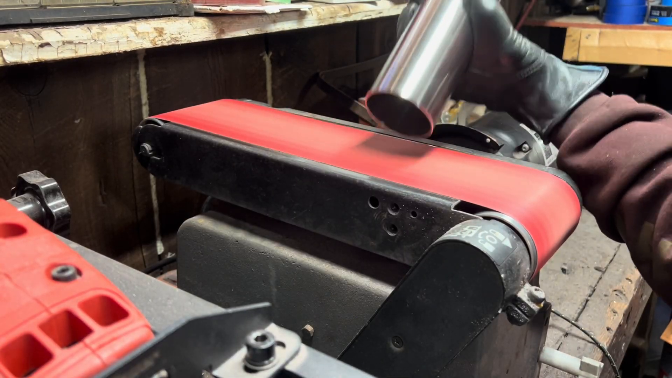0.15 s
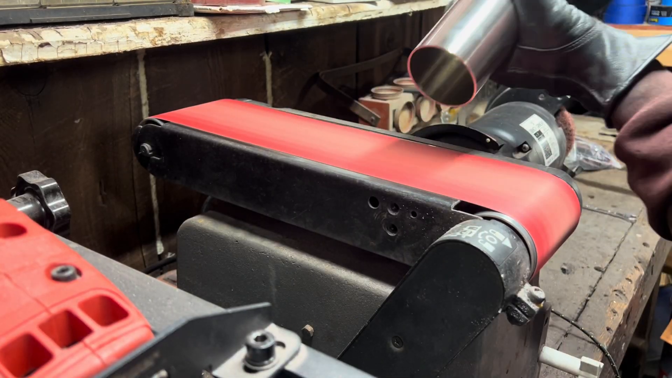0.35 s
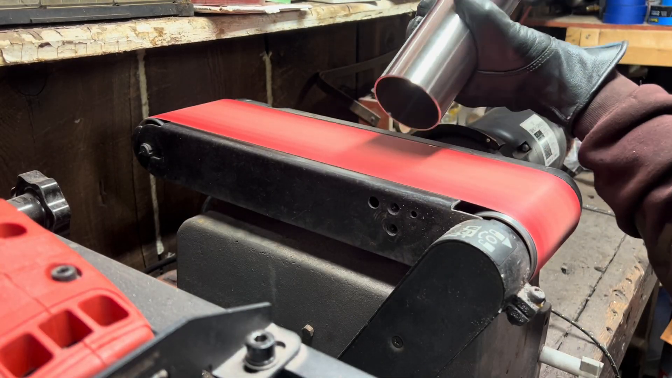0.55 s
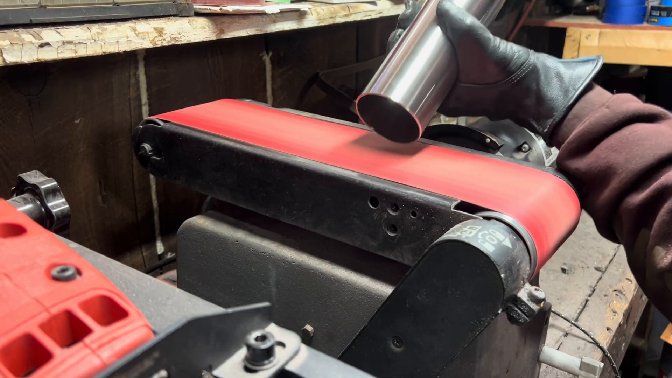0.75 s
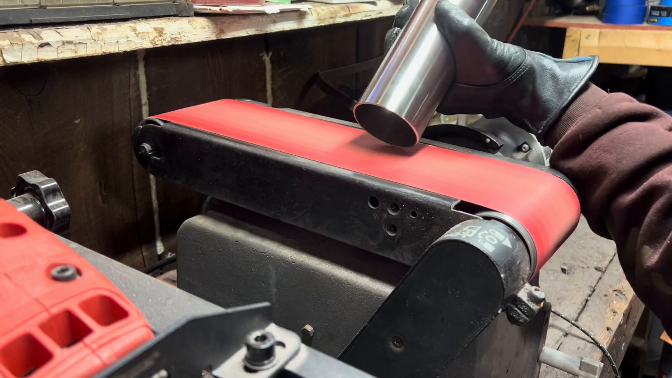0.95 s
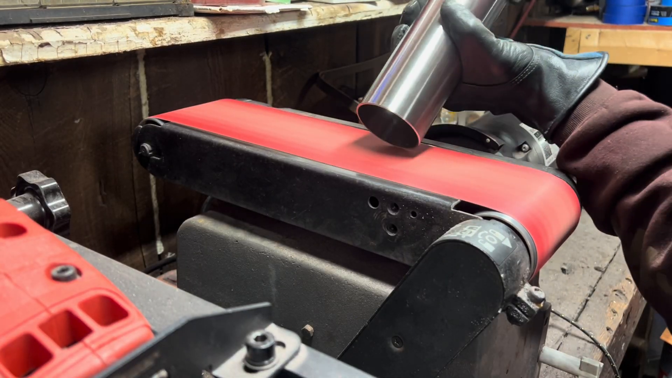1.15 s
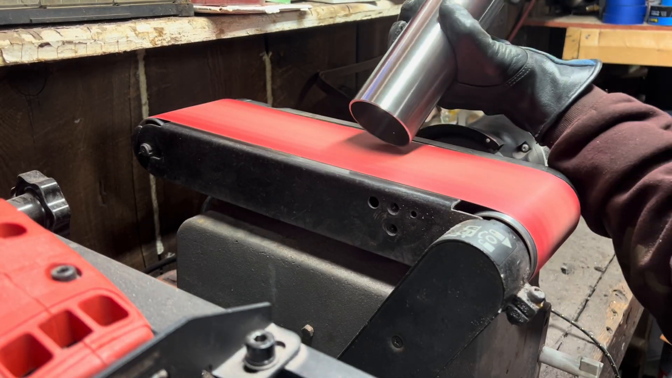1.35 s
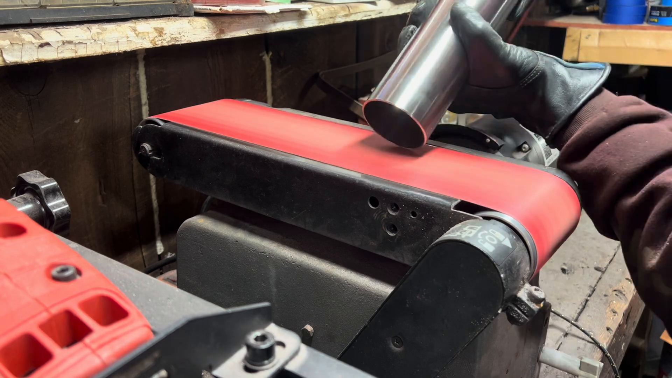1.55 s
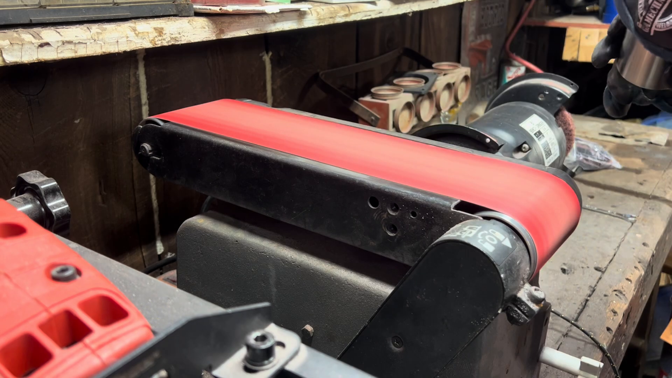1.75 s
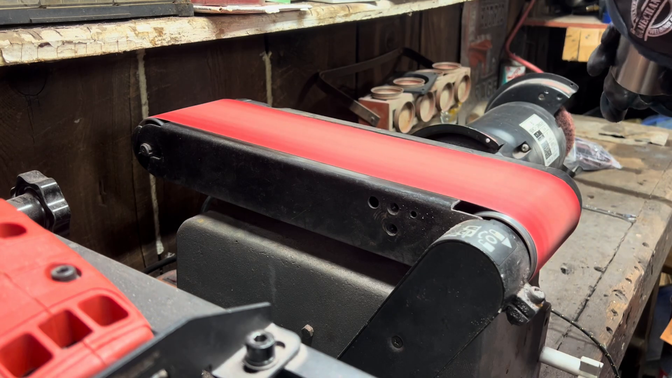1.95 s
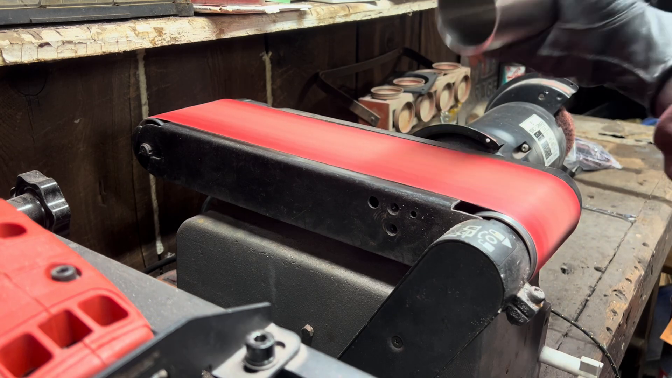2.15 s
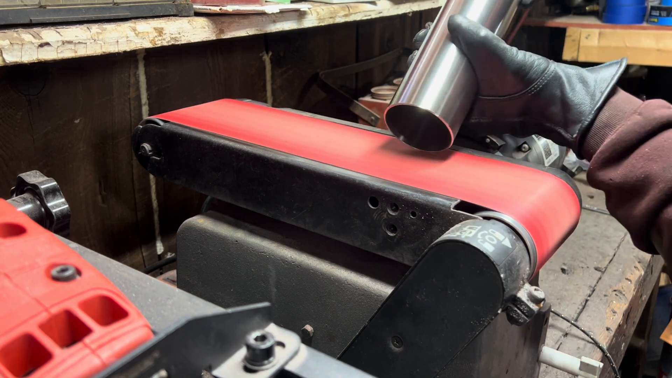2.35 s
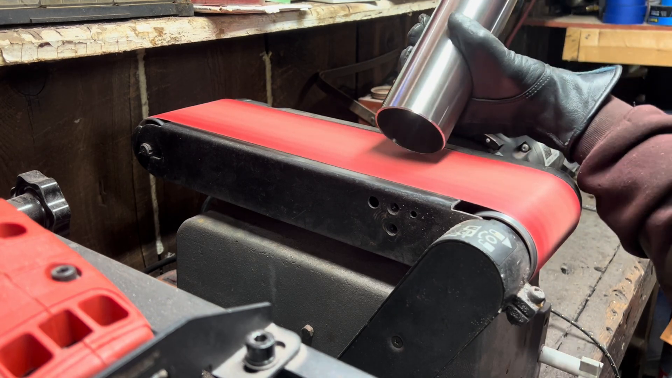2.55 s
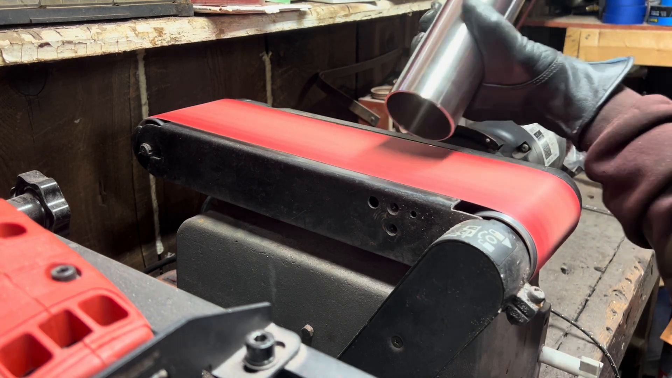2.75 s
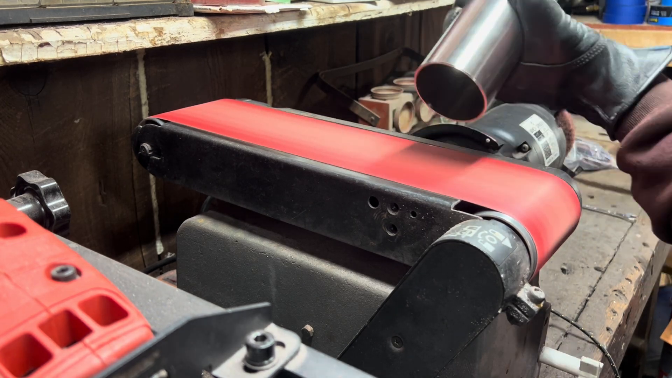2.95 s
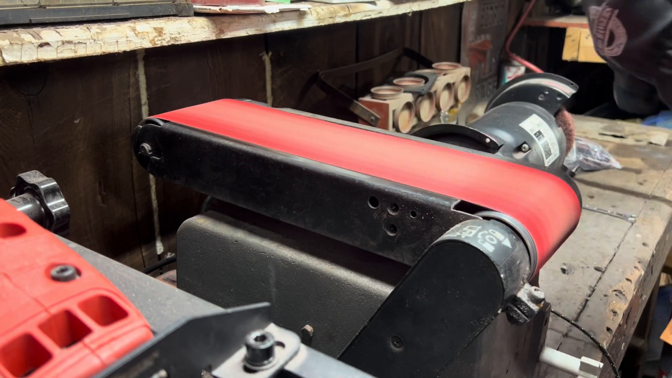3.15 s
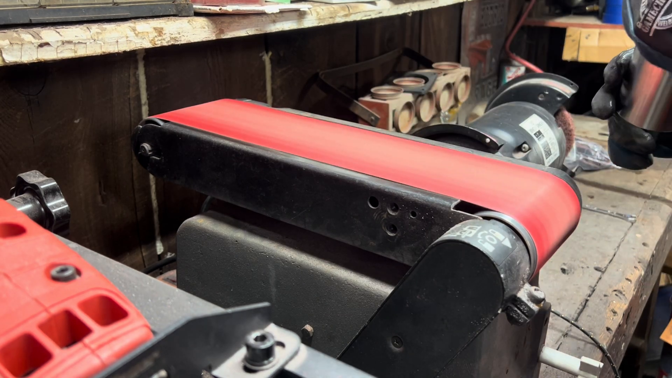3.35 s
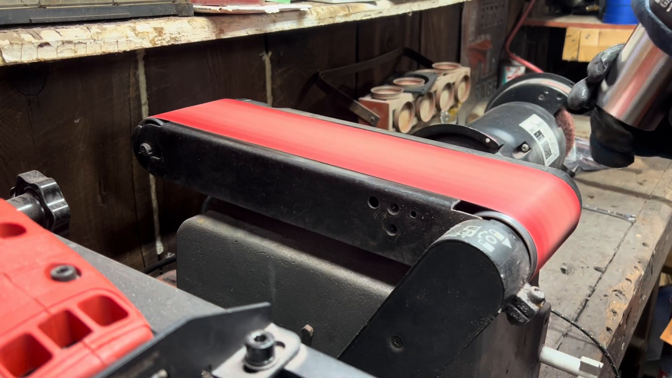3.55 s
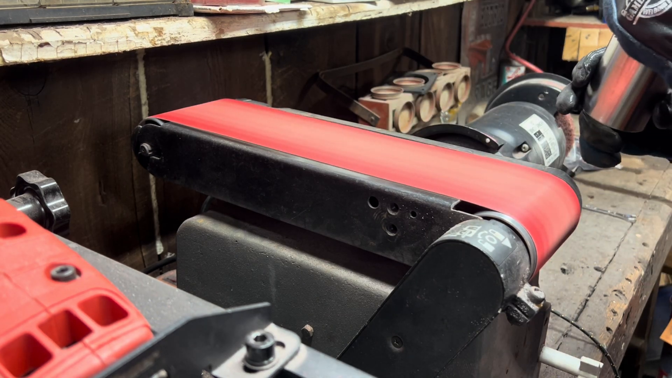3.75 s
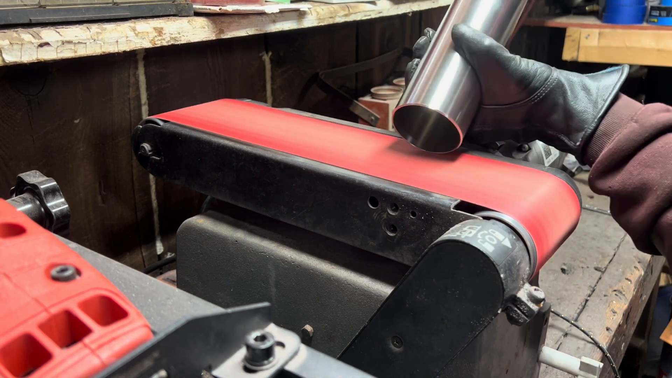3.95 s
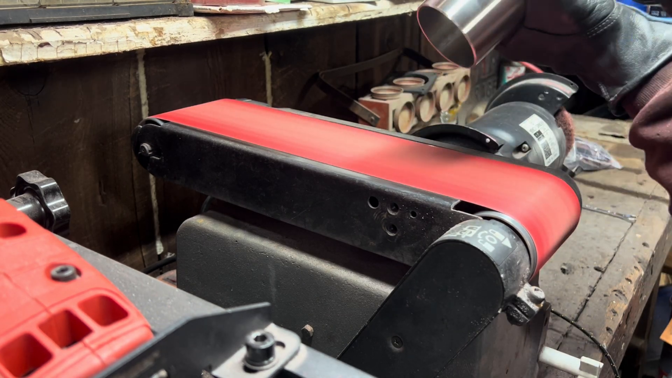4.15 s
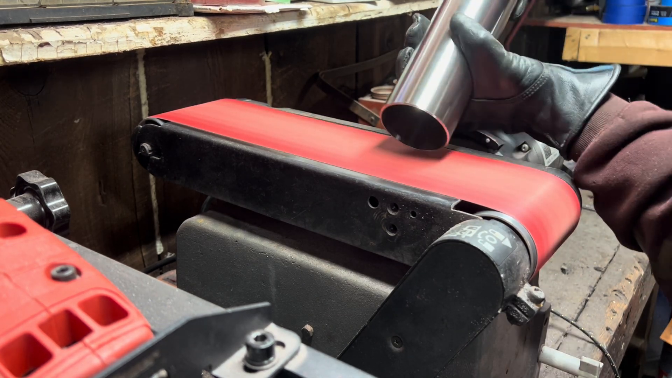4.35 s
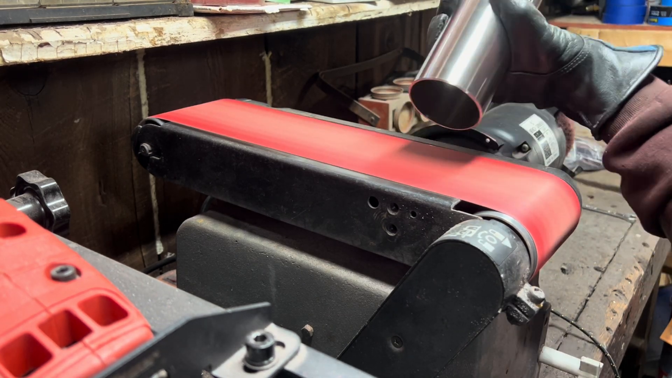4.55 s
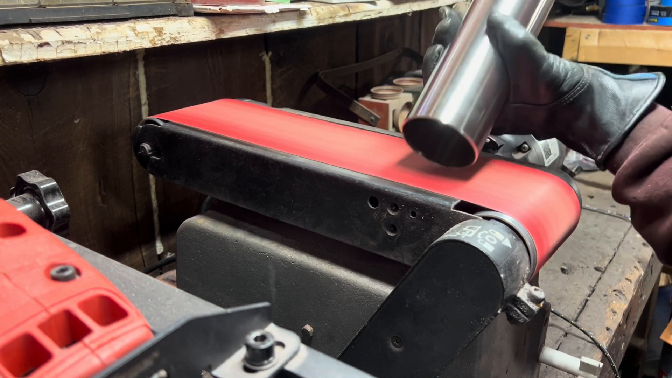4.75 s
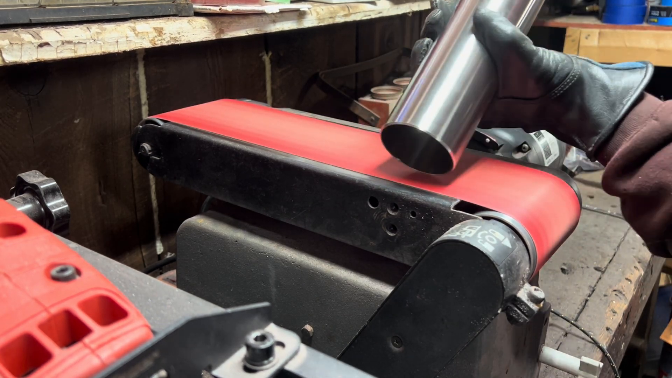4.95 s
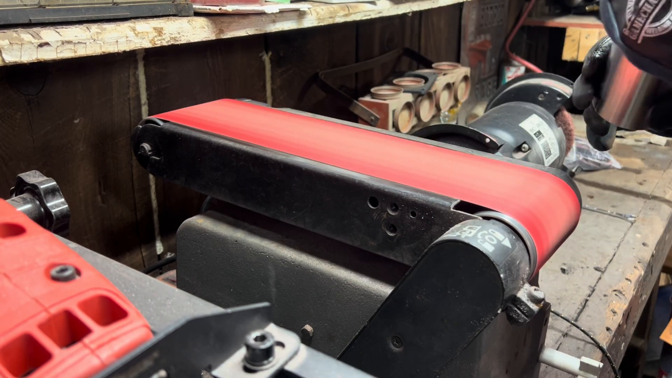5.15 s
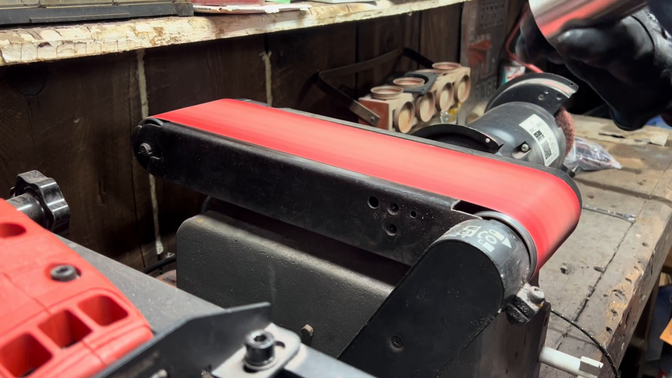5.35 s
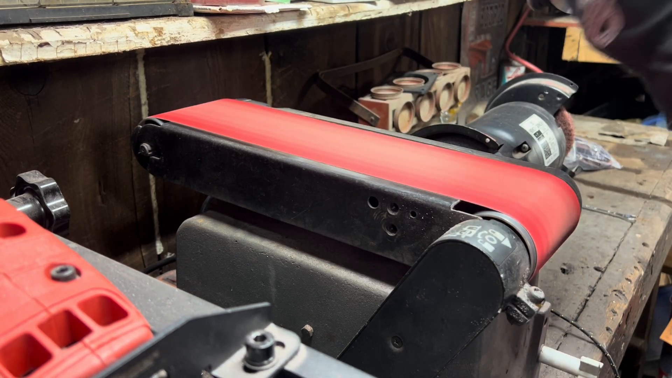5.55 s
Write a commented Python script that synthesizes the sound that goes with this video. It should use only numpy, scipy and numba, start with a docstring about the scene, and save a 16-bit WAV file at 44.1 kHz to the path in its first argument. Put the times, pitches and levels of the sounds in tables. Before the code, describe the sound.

Short, hissing metallic scrapes repeat about five times a second as a steel tube is ground on a running belt sander. They come in three groups separated by brief pauses, the last group the sharpest. Underneath, the motor hums, the bearings whistle and the belt hisses throughout, while the whine dips slightly with each touch. The sound is close and in stereo, with a little workshop reflection.

```python
"""Steel tube on a belt sander

A bench belt sander runs in a workshop, close to a pair of microphones. The housing rumbles, another machine
nearby hums, the bearings whistle and the belt hisses over its platen. The end of a steel tube is touched to the
belt in short strokes: grit scratches ring the tube wall, the rim shrieks where it bites, and the whine of the
drive sags under each stroke."""
import sys
import numpy as np
from scipy import signal
from scipy.fft import rfft, irfft, next_fast_len
from scipy.io import wavfile
from scipy.ndimage import uniform_filter1d
from numba import njit

SR = 44100
rng = np.random.default_rng(int(sys.argv[2]) if len(sys.argv) > 2 else 0)


def output_pcm(signal):
    """Save a mono or channel-first signal as 16-bit PCM at the path in sys.argv[1].

    Samples are clipped to [-1, 1] before scaling.
    """
    pcm = np.clip(np.atleast_2d(signal).T, -1, 1) * 32767
    wavfile.write(sys.argv[1], SR, np.round(pcm).astype(np.int16))


N = 246959
T = np.arange(N) / SR
FFT_SIZE = next_fast_len(N + 4096, True)
FREQS = np.arange(FFT_SIZE // 2 + 1) * SR / FFT_SIZE


def undb(db):
    """Decibels to gain."""
    return 10 ** (np.asarray(db) / 20)


def unit(x):
    """Scale to rms 1."""
    return x / np.sqrt(np.mean(x ** 2))


def shape(points):
    """Gain at every frequency from (freq_hz, level_db) points."""
    hz, db = np.transpose(points)
    return undb(np.interp(np.log(FREQS + 1), np.log(hz), db))


def colour(x, gain):
    """Filter by a gain at every frequency."""
    return irfft(rfft(x, FFT_SIZE) * gain, FFT_SIZE)[:N]


def resonances(modes):
    """Gain of a set of steep-sided resonances; each level sets the power of the whole peak."""
    return np.sqrt(sum(undb(db) ** 2 / width / (1 + ((FREQS - hz) / (0.44 * width)) ** 2) ** 2
                       for hz, width, db in modes))


@njit
def bandpass(x, centre_hz, width_hz):
    """State-variable band-pass whose centre moves."""
    y, band_state, low_state = np.empty(len(x)), 0., 0.
    for i in range(len(x)):
        g, damping = np.tan(np.pi * centre_hz[i] / SR), width_hz / centre_hz[i]
        band = (band_state + g * (x[i] - low_state)) / (1 + g * (g + damping))
        band_state = 2 * band - band_state
        low_state += 2 * g * band
        y[i] = damping * band
    return y


def walk(rate_hz):
    """Smooth random drift of rms 1, with rate_hz new values a second."""
    hold = max(int(SR / rate_hz), 2)
    steps = np.repeat(rng.standard_normal(N // hold + 2), hold)[rng.integers(hold):][:N]
    return unit(uniform_filter1d(uniform_filter1d(steps, hold), hold))


def phase_of(hz):
    """Phase in radians of a moving frequency."""
    return 2 * np.pi * np.cumsum(hz) / SR


def swell(points):
    """Level curve through (time_s, level_db) points, in dB above its own mean."""
    db = np.interp(T, *np.transpose(points))
    return db - db.mean()


def tones(table, flicker_db):
    """Steady tones that waver a little in level and pitch; close pairs beat."""
    total = 0
    for hz, db, wander_hz in table:
        amplitude = np.sqrt(2) * undb(db + flicker_db * walk(14))
        phase = phase_of(hz + wander_hz * walk(12)) + 2 * np.pi * rng.random()
        total += amplitude * np.sin(phase)
    return total


def grit(grains_per_s, spread_db):
    """Clicks of single abrasive grains, a few of them larger than the rest."""
    size = undb(spread_db * np.minimum(rng.exponential(size=N), 4))
    strikes = rng.random(N) < grains_per_s / SR
    return unit(strikes * size * rng.choice([-1, 1], N))


def reflections(x, t60_s):
    """Dense echoes from the bench and workshop walls, as strong as the sound itself."""
    t = T[:SR // 2]
    tail = rng.standard_normal(len(t)) * undb(-60 * t / t60_s) * (t > .002)
    return signal.fftconvolve(x, tail / np.linalg.norm(tail))[:N]


# stereo width of the sound at each frequency: freq_hz, side_minus_mid_db
STEREO_WIDTH = [(50, -5), (120, -6), (250, -20), (400, -27), (720, -25), (1150, -9), (1700, -8),
                (2200, -21), (3000, -23), (3800, -9), (6500, -9), (8200, -12), (10500, -5.5), (15000, -4)]
# tilt between the two microphones: freq_hz, left_minus_right_db
MIC_TILT = [(700, 0), (1300, -.5), (2400, 0), (4400, 1.5), (8100, -1), (12000, 2.2), (15000, 2.5)]


def microphone_pair(direct, diffuse):
    """Left and right at the bench: direct sound in the centre, diffuse sound from the sides."""
    side = colour(diffuse, shape(STEREO_WIDTH))
    lean = np.sqrt(shape(MIC_TILT))
    return np.array([colour(direct + side, lean), colour(direct - side, 1 / lean)])


# rise and fall of the running machine, heard at the bench: time_s, relative_db
MACHINE_LEVEL = [(0.0, -39), (0.2, -35.5), (1.55, -36.5), (2.45, -33.3), (2.85, -37), (3.0, -36.5),
                 (3.25, -36), (3.95, -32.5), (5.15, -37.5), (5.6, -35)]
# spectrum of the housing's rumble: freq_hz, relative_db
HOUSING_SPECTRUM = [(20, -31), (150, -32), (225, -29.5), (280, -16), (335, -2), (400, -4), (485, 6),
                    (550, -0.5), (690, 6), (770, -1), (1100, -3.5), (1300, -6.5), (2000, -8.5), (4000, -31)]


def housing_rumble(level_db=-42.5, follow=0.88):
    """The housing gives a low noise that swells with the machine."""
    rumble = unit(colour(rng.standard_normal(N), shape(HOUSING_SPECTRUM)))
    return rumble * undb(level_db + follow * swell(MACHINE_LEVEL))


# steady tones of another machine nearby: pitch_hz, relative_db, wander_hz
NEARBY_HUM_TONES = [(177.6, -77, .1), (349.7, -46.5, 1.8), (588.9, -40.8, .8), (598, -54, 1), (698.5, -46, 2.5),
                    (710.3, -45.8, 1), (818.3, -58, 1), (888.5, -52.5, .7), (957, -54, 1.5), (988, -57, 3),
                    (1076, -53, 7), (1200, -50.7, .3), (1378, -54.7, .4), (1595, -58, 6), (1674, -60, 3)]


def nearby_hum(gain_db=-1, follow=0.87):
    """Another machine in the workshop hums in wavering tones that swell with the sander's level."""
    return tones(NEARBY_HUM_TONES, flicker_db=1.5) * undb(gain_db + follow * swell(MACHINE_LEVEL))


# tones of the bearings: pitch_hz, relative_db, wander_hz
BEARING_TONES = [(4290, -58, 1), (4769, -51, 2), (5580, -49, 2), (5979, -53, 2), (6977, -50, 2),
                 (9060, -50, 5), (14304, -57, 4)]


def bearing_whistle(gain_db=-1):
    """The bearings give thin, high whistles that flicker."""
    return tones(BEARING_TONES, flicker_db=4.5) * undb(gain_db)


# rise and fall of the drive's whine: time_s, relative_db
WHINE_LEVEL = [(0.0, -42), (0.45, -39.5), (0.9, -45.5), (1.15, -41), (1.75, -44.5), (1.85, -36),
               (2.05, -45.5), (2.15, -37.5), (2.95, -46.5), (3.05, -43), (3.5, -45.5), (3.65, -39.5),
               (3.75, -42.5), (3.85, -36), (4.2, -42.5), (5.05, -44.5), (5.15, -47), (5.6, -41.5)]
# partials of the drive: tooth_rate_multiple, relative_db
DRIVE_PARTIALS = [(1, -15.5), (2, -4), (4, -10.5), (5, 2), (6, -3), (7, -4), (8, -5), (9, -8), (10, -11),
                  (12, 6), (13, 1), (14, -28), (17, 0)]


def drive_whine(contact, tooth_hz=475.4, sag=.016, inertia_s=.02, waver=.002, gain_db=-44, flutter_db=3):
    """Tooth phase and whine of the drive, which slows while the tube drags on the belt."""
    lag = np.exp(-1 / (inertia_s * SR))
    load = signal.lfilter([1 - lag], [1, -lag], contact)
    tooth_phase = phase_of(tooth_hz * (1 - sag * load + waver * walk(25)))
    swell_db = swell(WHINE_LEVEL) + flutter_db * np.tanh(walk(24.91))
    whine = 0
    for multiple, db in DRIVE_PARTIALS:
        stutter = 1 + .36 * (walk(55) + 1j * walk(55))  # in both strength and phase
        partial = (stutter * np.exp(1j * multiple * tooth_phase)).imag
        follow = np.clip(undb(db), 0.3, 1)  # strong partials follow the swell most
        whine += undb(db + follow * swell_db) * partial
    return tooth_phase, whine * undb(gain_db)


# brief scuffs of the belt on its platen: time_s, rise_db
BELT_SCUFFS = [(0.015, 5.5), (1.848, 3.5), (1.923, 3.5), (4.2, 4), (5.38, 1), (5.495, 3)]


def rubbing_swell(lap_hz=7.69, lap_peak_s=.046, lap_db=1.2, flutter_db=.9, scuff_s=.02):
    """Swell of the belt's rubbing in dB: it follows machine and whine, peaks once a lap and scuffs."""
    following = 0.58 * swell(MACHINE_LEVEL) + 0.15 * swell(WHINE_LEVEL)
    lap = lap_db * np.cos(2 * np.pi * lap_hz * (T - lap_peak_s))
    scuffs = sum(db * np.exp(-((T - time_s) / scuff_s) ** 2) for time_s, db in BELT_SCUFFS)
    return following + lap + flutter_db * walk(45) + scuffs


# hiss of the belt over the platen, from close by: freq_hz, relative_db
BELT_SPECTRUM = [(200, -54), (1200, -16.5), (2400, -10), (4300, -10), (5200, -5.5), (6400, -12), (7400, -2),
                 (8400, -1.5), (9400, -6.5), (11700, -10.5), (12650, -17), (13800, -13), (15800, -19)]
# rings of the platen: pitch_hz, width_hz, relative_db
PLATEN_MODES = [(5460, 210, -10.5), (5630, 290, 0), (5990, 110, -14.5), (6120, 50, -4), (6695, 170, -1),
                (7060, 590, 0.5), (8180, 520, 2), (10540, 330, -5), (11390, 450, -8), (11710, 320, -8),
                (13040, 660, -4.5)]


def belt_on_platen(tooth_phase, swell_db, contact, rub_db=-31.5, held_db=1,
                   sing_hz=5688, sing_width_hz=70, sing_db=-38.3):
    """The belt rubs the platen in pulses at the tooth rate, rings it and makes it sing."""
    pulse = (1 + .17 * np.cos(tooth_phase)) * undb(.6 * walk(250))
    hiss = unit(colour(grit(grains_per_s=16000, spread_db=2.5) * pulse, shape(BELT_SPECTRUM)))
    knocks = grit(grains_per_s=15000, spread_db=0.5) * pulse
    # the belt flaps from spot to spot, so each ring flares on its own
    rings = unit(sum(colour(knocks, resonances([mode])) * undb(2.3 * walk(24)) for mode in PLATEN_MODES))
    rubbing = (hiss + rings) * undb(rub_db + swell_db)
    note = unit(colour(rng.standard_normal(N), resonances([(sing_hz, sing_width_hz, 0)])))
    singing = note * undb(sing_db + 0.35 * swell_db)
    return (rubbing + singing) * undb(held_db * contact)  # harder while the tube holds the belt down


# touches of the tube on the belt: start_s, length_s, scratch_db, shriek_db, first_pitch_hz
TUBE_STROKES = [(0.075, 0.095, -27.5, -31, 8300), (0.422, 0.15, -24, -30, 8200),
                (0.632, 0.14, -24.5, -28, 8150), (0.861, 0.15, -25.5, -26.5, 8200),
                (1.084, 0.13, -26.5, -24.5, 8200), (1.278, 0.13, -27, -28, 8150),
                (1.487, 0.12, -27, -26, 8300), (2.294, .110, -23.5, -26, 8140),
                (2.475, 0.12, -23, -22.5, 8200), (2.64, 0.13, -24.5, -20.5, 8280),
                (2.84, 0.094, -25, -22.5, 8200), (3.012, .123, -25.5, -22.5, 8100),
                (3.939, 0.0887, -21, -21, 8100), (4.287, .102, -23, -22, 8200),
                (4.442, 0.11, -23.5, -21.5, 8270), (4.606, 0.11, -26.5, -21, 8260),
                (4.781, 0.11, -24.5, -18.5, 8530), (4.948, 0.11, -23.5, -19, 8770)]


def hand_strokes(press_share=.2, lift_s=.016, bite_s=.065, settled_hz=8150.,
                 knock_at_s=4.95, knock_db=-22, knock_decay_s=.0044):
    """Contact, scratch gain, shriek gain and shriek pitch as the tube is pressed on and lifted off."""
    contact, scratch_gain, shriek_gain = np.zeros((3, N))
    shriek_hz = np.full(N, settled_hz)
    for start_s, length_s, scratch_db, shriek_db, first_pitch_hz in TUBE_STROKES:
        age = np.maximum(T - start_s, 0)
        press = np.clip(age / (press_share * length_s), 0, 1) * np.clip((length_s - age) / lift_s, 0, 1)
        # the sharp rim bites hardest at first, then the shriek fades and its pitch settles
        bite = 1 / (1 + (age / bite_s) ** 4)
        contact += press
        scratch_gain += press * undb(scratch_db)
        shriek_gain += press * undb(shriek_db) * bite
        shriek_hz += (press > 0) * (first_pitch_hz - settled_hz) * bite
    # once, the rim lands hard on the belt
    knock = undb(knock_db) * (T > knock_at_s) * np.exp(-np.abs(T - knock_at_s) / knock_decay_s)
    return contact, scratch_gain + knock, shriek_gain + knock, shriek_hz


# rings of the steel tube's wall, from close by: pitch_hz, width_hz, relative_db
TUBE_MODES = [(1064, 76, -17), (1660, 220, -13.5), (1852, 44, -18.5), (2785, 130, -15.5),
              (3480, 270, -15.5), (5340, 290, -6.5), (5740, 270, -2), (5960, 210, -2.5), (6950, 53, -3.5),
              (8020, 290, 1), (8500, 100, 0.5), (10020, 290, -1.5), (12110, 550, -3.5), (12900, 1200, -4.5),
              (13700, 400, -8), (14800, 450, -12), (15600, 500, -13.5)]
# bare scratch of the grit: freq_hz, relative_db
SCRATCH_SPECTRUM = [(200, -40), (600, -8), (1600, -1.5), (2100, -12), (4000, -6.5), (5200, 11), (6400, 5),
                    (9000, 1), (11000, 4), (16000, -27.5)]


def tube_grind(tooth_phase, scratch_gain, shriek_gain, shriek_hz,
               bare_db=-6, shriek_width_hz=1500., room_db=-15):
    """Grains strike the chattering rim; they ring the tube wall and make the contact shriek."""
    chatter = undb(1.5 * walk(700)) * (1 + .15 * np.cos(tooth_phase))
    wall_response = np.hypot(unit(resonances(TUBE_MODES)), undb(bare_db) * unit(shape(SCRATCH_SPECTRUM)))
    scratch = colour(grit(grains_per_s=16000, spread_db=2) * chatter, wall_response)
    shriek = grit(grains_per_s=12000, spread_db=0.5) * chatter
    for _ in range(2):
        shriek = bandpass(shriek, shriek_hz, shriek_width_hz)
    grind = scratch_gain * unit(scratch) + shriek_gain * unit(shriek)
    return grind + undb(room_db) * reflections(grind, t60_s=0.27)


def scene():
    """Sander and tube on the workshop bench, close to a pair of microphones."""
    rub_swell_db = rubbing_swell()
    contact, scratch_gain, shriek_gain, shriek_hz = hand_strokes()
    tooth_phase, whine = drive_whine(contact)
    machine_tones = nearby_hum() + bearing_whistle() + whine

    def noises():
        """Housing, belt and tube, with fresh noise on each call."""
        machine = housing_rumble() + belt_on_platen(tooth_phase, rub_swell_db, contact)
        return machine + tube_grind(tooth_phase, scratch_gain, shriek_gain, shriek_hz)

    return microphone_pair(direct=noises() + machine_tones, diffuse=noises())


def record(dry):
    """The recorder cuts the top steeply."""
    top_hz = 15750
    return signal.sosfilt(signal.ellip(12, .1, 80, top_hz, fs=SR, output="sos"), dry)


dry = scene()
out = record(dry)
output_pcm(out)
```